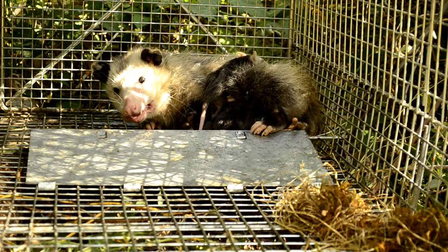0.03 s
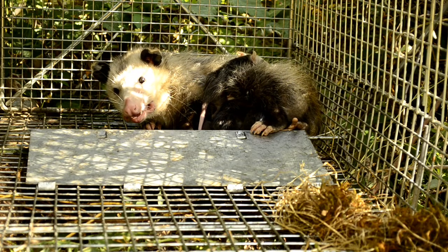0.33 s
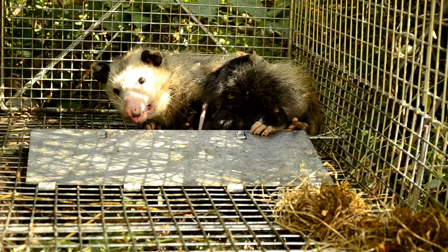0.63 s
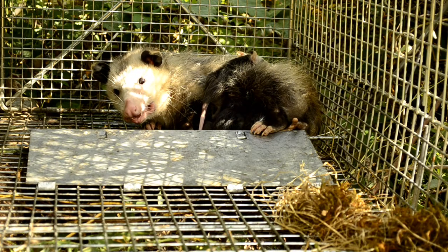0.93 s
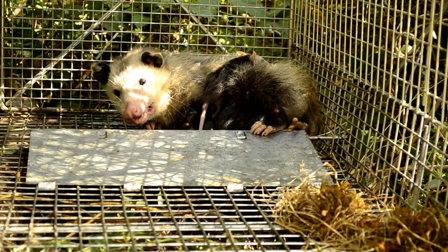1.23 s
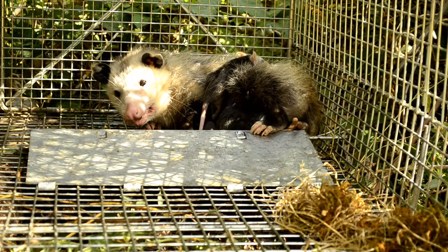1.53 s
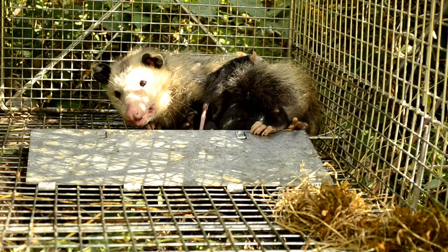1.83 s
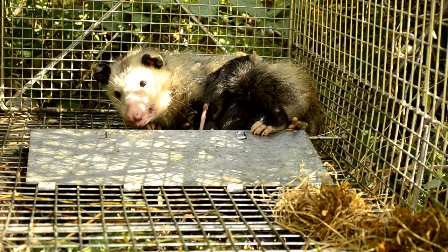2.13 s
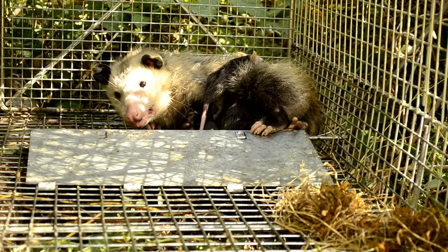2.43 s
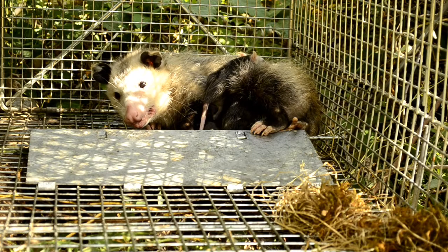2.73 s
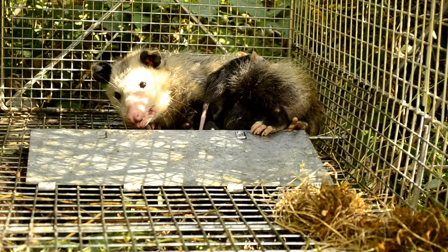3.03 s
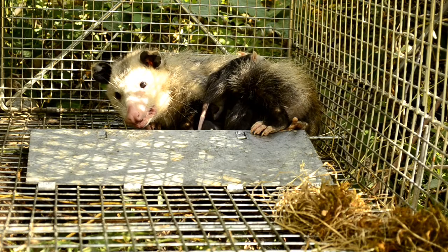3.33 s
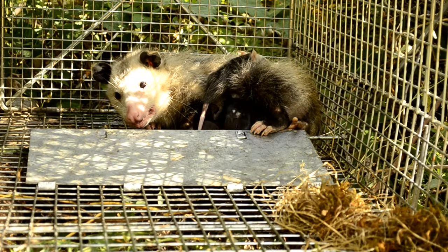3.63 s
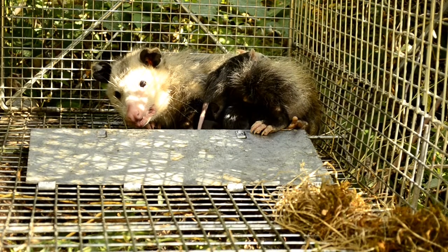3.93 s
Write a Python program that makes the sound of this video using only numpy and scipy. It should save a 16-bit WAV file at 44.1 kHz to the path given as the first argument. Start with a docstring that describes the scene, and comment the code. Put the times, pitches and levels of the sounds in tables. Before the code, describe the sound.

Close clicks and a clack come from a handled metal cage outdoors. At first there is only soft air and a faraway motor, then ticks, sharp clicks and a brief scrape ending in the loud clack and faint ringing.

```python
"""Outdoors by a wire cage trap: quiet air hiss, a distant motor hum and one soft bump.
Near the end something hard is handled right at the microphone: small ticks, three sharp clicks,
then a short sliding scrape that ends in a loud clack and leaves thin wires ringing faintly.
Contacts and the tiny catches of friction ring the same body modes; a limiter ducks the clack."""
import sys
import numpy as np
from scipy import signal
from scipy.fft import rfft, irfft
from scipy.io import wavfile
from scipy.ndimage import uniform_filter1d, minimum_filter1d

SR = 44100
rng = np.random.default_rng(int(sys.argv[2]) if len(sys.argv) > 2 else 0)


def wav_out(sig):
    """Save sig, one row per channel (or a flat mono array), as 16-bit PCM at SR to the path in sys.argv[1]."""
    wavfile.write(sys.argv[1], SR, np.round(np.clip(np.atleast_2d(sig).T, -1, 1) * 32767).astype(np.int16))


N = 4 * SR


def undb(db):
    """Decibels to gain."""
    return 10 ** (np.asarray(db) / 20)


def unit(x):
    """Scale to rms 1."""
    return x / np.sqrt(np.mean(x ** 2))


def envelope(rows, column=1):
    """Gain along rows of t/s, level/dB."""
    rows = np.array(rows)
    return undb(np.interp(np.arange(N) / SR, rows[:, 0], rows[:, column]))


def colour(x, spectrum):
    """Filter by rows of f/Hz, level/dB."""
    hz, db = np.array(spectrum).T
    bins_hz = np.maximum(np.fft.rfftfreq(len(x), 1 / SR), 1)
    gain = undb(np.interp(np.log(bins_hz), np.log(hz), db))
    return irfft(rfft(x) * gain, len(x))


def drift(rate_hz):
    """Slow random drift, rms 1."""
    span = int(SR / rate_hz)
    steps = np.repeat(rng.standard_normal(N // span + 1), span)
    return unit(uniform_filter1d(uniform_filter1d(steps, span), span)[:N])


def decay(t60_s, size):
    """Exponential fall, 60 dB in t60_s."""
    return np.exp(-np.log(1000) * np.arange(size) / SR / t60_s)


def ring(modes, size):
    """Struck modes (f/Hz, level/dB, t60/s), alternating in sign."""
    t = np.arange(size) / SR
    return sum((-1) ** k * undb(db) * np.sin(2 * np.pi * hz * t) * decay(t60_s, size)
               for k, (hz, db, t60_s) in enumerate(modes))


def highpass(x, hz, order):
    """Butterworth low cut."""
    return signal.sosfilt(signal.butter(order, hz, "high", fs=SR, output="sos"), x)


def add(out, start_s, x):
    """Mix x into out at start_s."""
    i = int(start_s * SR)
    out[i:i + len(x)] += x[:len(out) - i]


# f/Hz, relative density/dB
AIR_SPECTRUM = [(25, -12.5), (50, -9.5), (90, -4.5), (135, -6.5), (180, -4.5), (230, -10.5), (420, -11.5),
                (800, -11), (1700, -16.5), (3000, -24.5), (5700, -37), (9000, -40.5), (12500, -43),
                (15500, -45.5)]
# t/s, level/dB
AIR_ENVELOPE = [(0, -61), (1.9, -61), (2.4, -60.5), (3.3, -60.5), (3.65, -58), (4.0, -57.5)]

def air(swell_db=-0.96):
    """Soft outdoor hiss that swells a little."""
    hiss = unit(colour(rng.standard_normal(N), AIR_SPECTRUM))
    return hiss * envelope(AIR_ENVELOPE) * undb(swell_db * drift(6))


# t/s, then level/dB of harmonics 1, 2, 3
HUM_ENVELOPES = [(0, -77.5, -69, -75.5), (1.0, -69, -70, -75), (1.7, -75.5, -72.5, -74),
                 (2.12, -73, -72.5, -75.5), (2.27, -65.5, -68, -69), (2.85, -61, -70, -79.5),
                 (3.18, -64.5, -66.5, -90), (3.32, -80.5, -61.5, -70), (4.0, -65, -65.5, -87)]

def motor_hum(pitch_hz=91.8, wander=.026, flutter_db=2.5):
    """Distant motor: three harmonics wavering in pitch and level."""
    phase = 2 * np.pi * np.cumsum(pitch_hz * (1 + wander * drift(7.2))) / SR
    out = np.zeros(N)
    for k in (1, 2, 3):
        harmonic = unit(np.sin(k * phase + 2 * np.pi * rng.random()))
        out += harmonic * envelope(HUM_ENVELOPES, column=k) * undb(flutter_db * drift(4.3))
    return out


# t/s, level/dB
BUMP_HITS = [(2.6529, -42.5)]
# f/Hz, relative level/dB, t60/s
BUMP_RESONANCES = [(135, -3, .055), (294, -0.5, 0.055), (623, -4.5, .02)]

def bump():
    """A soft knock rings low, damped modes."""
    out = np.zeros(N)
    for start_s, db in BUMP_HITS:
        add(out, start_s, undb(db) * ring(BUMP_RESONANCES, size=8192))
    return out


# f/Hz, level/dB, t60/s
WIRE_MODES = [(380, -52.5, .5), (890, -58, 0.59), (1303, -65.5, 1.2), (1513, -63, 1.5), (2880, -66, 1.4),
              (3138, -65, .55), (3693, -72.5, 1.1)]

def wires(clack_s=3.779):
    """Thin wires ring on after the clack."""
    out = np.zeros(N)
    add(out, clack_s, ring(WIRE_MODES, N))
    return out


# f/Hz, relative level/dB, t60/s
BODY_MODES = [(753, -2.5, .025), (1041, -7.5, 0.043), (1147, -6.5, .033), (1299, -4, .038),
              (1545, -8.5, 0.031), (1940, 7.5, 0.011), (2140, -12, 0.027), (2400, 0, 0.01),
              (2961, -6, 0.02), (3337, -0.5, .017), (4050, -4.5, .015), (4410, -8.5, .012),
              (6200, -12, .01), (7200, -13, .006)]

def body(contact_hz, fall_db_per_oct, size=4096):
    """The handled body rings; a contact favours the modes near its own pitch."""
    modes = [(hz, db - fall_db_per_oct * abs(np.log2(hz / contact_hz)), t60_s)
             for hz, db, t60_s in BODY_MODES]
    return ring(modes, size)


# f/Hz, gain/dB
TICK_SPECTRUM = [(1500, -18.5), (3500, -1.5), (6300, 2), (8300, -5.5), (10500, -8.5), (12500, -13.5),
                 (16000, -21.5)]

def treble(excitation):
    """The bright colour of ticks and grit."""
    return colour(excitation, TICK_SPECTRUM)


# t/s, level/dB: light rubbing among the ticks and clicks
RUB_ENVELOPE = [(3.36, -70), (3.38, -50.5), (3.43, -53), (3.475, -53), (3.50, -66), (3.61, -57),
                (3.638, -49), (3.665, -51), (3.70, -71)]
# t/s, level/dB: scrape into the clack
SLIDE_ENVELOPE = [(3.695, -64), (3.724, -43), (3.745, -38.5), (3.751, -57), (3.755, -33.5), (3.763, -32),
                  (3.775, -26), (3.783, -36.5), (3.80, -92)]

def friction(levels, catches_per_s, grit_db, edge_hz, fall_db_per_oct):
    """Dense tiny catches ring the body around the sliding edge's pitch and add grit."""
    t = np.arange(N) / SR
    touching = (t > levels[0][0]) & (t < levels[-1][0])
    catches = unit((rng.random(N) < catches_per_s / SR) * rng.standard_normal(N))
    catches *= envelope(levels) * touching
    response = highpass(body(edge_hz, fall_db_per_oct), hz=950, order=6)
    ringing = signal.fftconvolve(catches, response / np.linalg.norm(response))[:N]
    return ringing + undb(grit_db) * treble(catches)


# t/s, crack f/Hz, then level/dB of crack, body ring, tick, thump
CONTACTS = [ (3.3756, 1220, -26.5, -40, -47, -70), (3.3823, 1100, -33, -55, -65, -74),
            (3.3896, 2030, -48, -59, -52, -70), (3.397, 4230, -40, -62, -53, -71),
            (3.4080, 3220, -33.5, -55, -66, -72), (3.4432, 2040, -25.5, -48, -55, -74),
            (3.4597, 1100, -31, -60, -68, -72), (3.4659, 1370, -34, -55, -72, -72),
            (3.4745, 1880, -27.5, -47, -61, -74), (3.4999, 1170, -24, -56, -73, -69),
            (3.578, 10700, -38, -50, -48.5, -68), (3.5810, 3680, -26.5, -48, -62, -60),
            (3.5897, 1170, -31, -58, -66, -68), (3.6197, 2484, 0.5, -19.5, -11.5, -25.5),
            (3.6294, 1020, -11, -30.5, -27, -63), (3.6555, 3770, -7, -25.5, -23, -31),
            (3.656, 1260, -13.5, -46, -26, -50), (3.6584, 3500, -14.5, -37, -33, -46),
            (3.6781, 1170, -33, -60, -71, -66), (3.7711, 3430, -25, -21.5, -30, -34.5),
            (3.7763, 1170, -1, -13.5, -27.5, -36), (3.7779, 1770, 10, -3.5, -5, -4.5),
            (3.7818, 1280, -5.5, -25.5, -24.5, -38), ]

def clicks(crack_t60_cycles=10, rise_cycles=.35, thump_hz=400, thump_t60_s=.004, size=4096):
    """Each hard contact gives a brief crack, a treble tick and a thump, and rings the body."""
    out = np.zeros(N)
    t = np.arange(size) / SR
    for start_s, hz, crack_db, ring_db, tick_db, thump_db in CONTACTS:
        rise = 1 - np.exp(-t * hz / rise_cycles)
        crack = ring([(hz, crack_db, crack_t60_cycles / hz)], size)
        ringing = undb(ring_db) * body(hz, fall_db_per_oct=3, size=size)
        noise = unit(treble(rng.standard_normal(size)))
        tick = undb(tick_db) * noise * decay(t60_s=.0045, size=size)
        thump = ring([(thump_hz, thump_db, thump_t60_s)], size)
        add(out, start_s, rise * (crack + ringing) + tick + thump)
    return highpass(out, hz=170, order=1)


def scene():
    """Close handling over the outdoor background, mono."""
    slide = friction(SLIDE_ENVELOPE, catches_per_s=7000, grit_db=-21.5, edge_hz=2100, fall_db_per_oct=7)
    rub = friction(RUB_ENVELOPE, catches_per_s=2000, grit_db=-21, edge_hz=1120, fall_db_per_oct=16.5)
    return (clicks() + slide + rub + wires() + bump() + motor_hum() + air())[None]


def record(dry, threshold=.55, hold_s=.085, detect_s=.0006, clip_level=.92, top_hz=15700):
    """A limiter ducks on the clack and holds briefly; peaks round off and the top is cut."""
    half_hold = int(hold_s * SR / 2)
    level = uniform_filter1d(np.abs(dry), int(detect_s * SR))
    gain = np.minimum(1, threshold / (level + 1e-9))
    held_gain = minimum_filter1d(gain, 2 * half_hold + 1, origin=half_hold)
    limited = dry * uniform_filter1d(held_gain, size=16)
    rounded = limited / (1 + (limited / clip_level) ** 6) ** (1 / 6)
    return signal.sosfilt(signal.ellip(8, .2, 80, top_hz, fs=SR, output="sos"), rounded)


dry = scene()
out = record(dry)
wav_out(out)
```